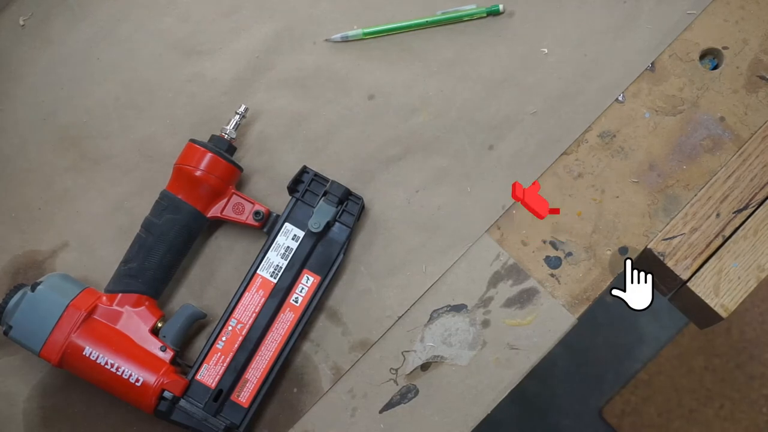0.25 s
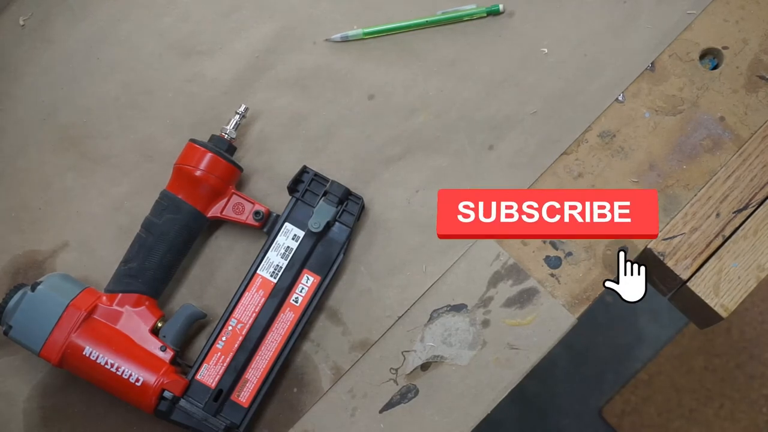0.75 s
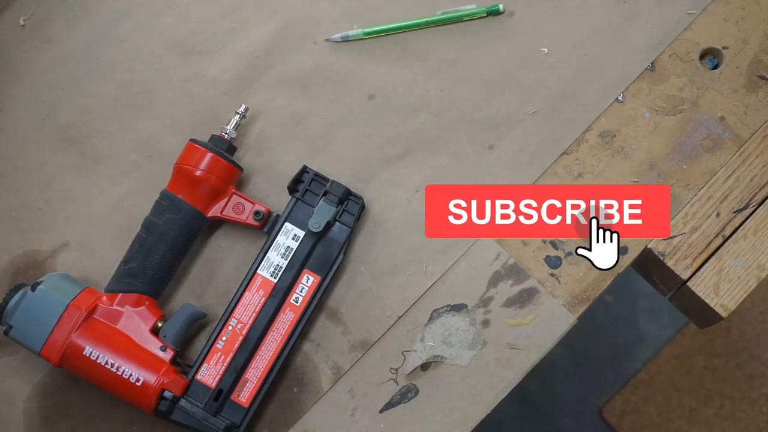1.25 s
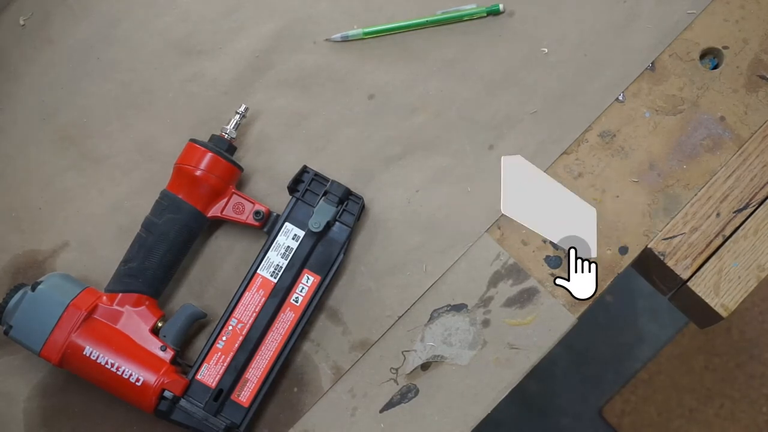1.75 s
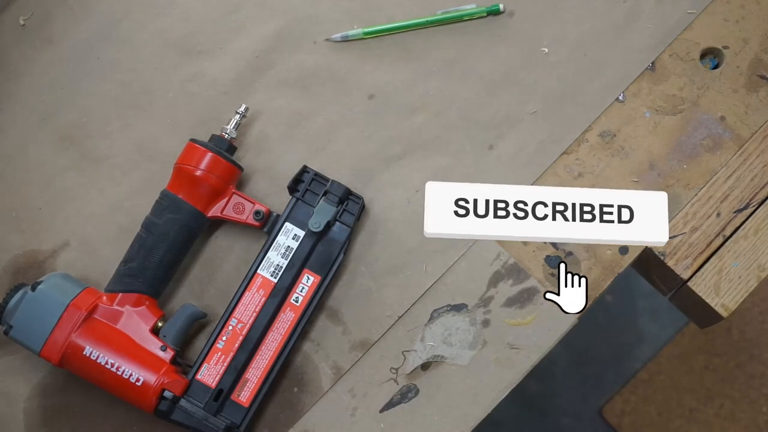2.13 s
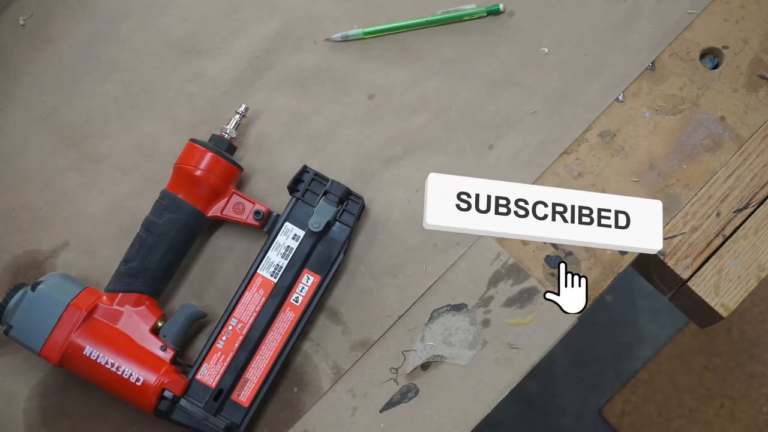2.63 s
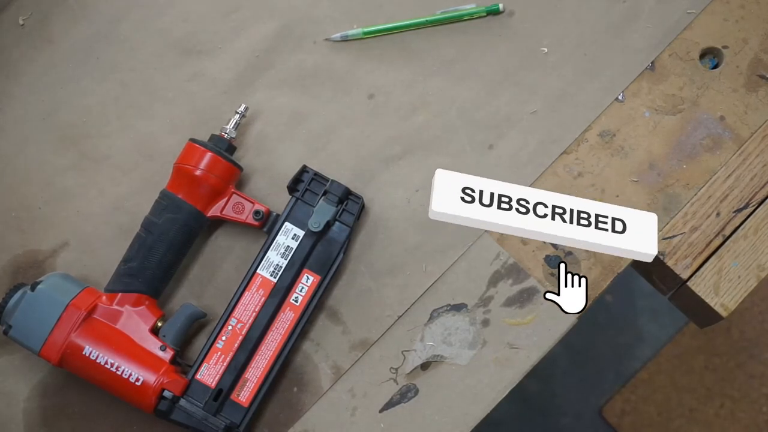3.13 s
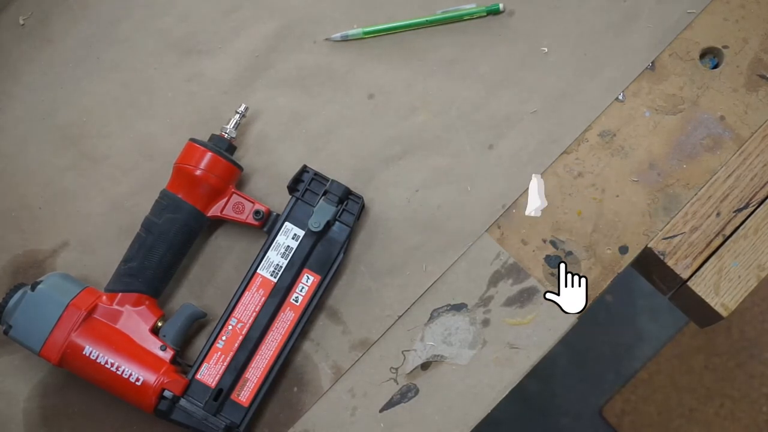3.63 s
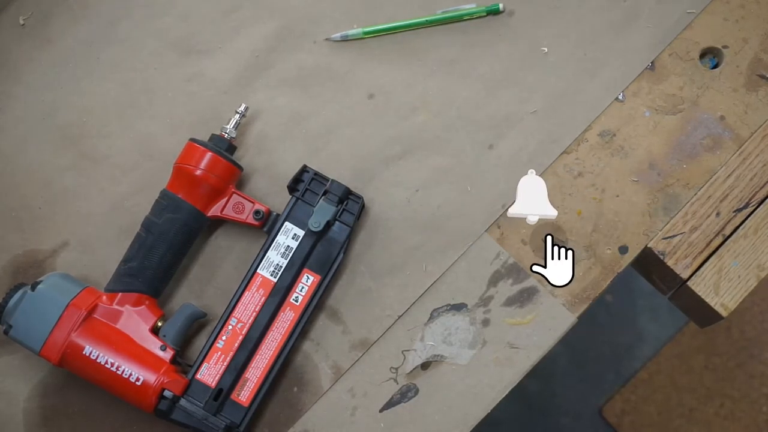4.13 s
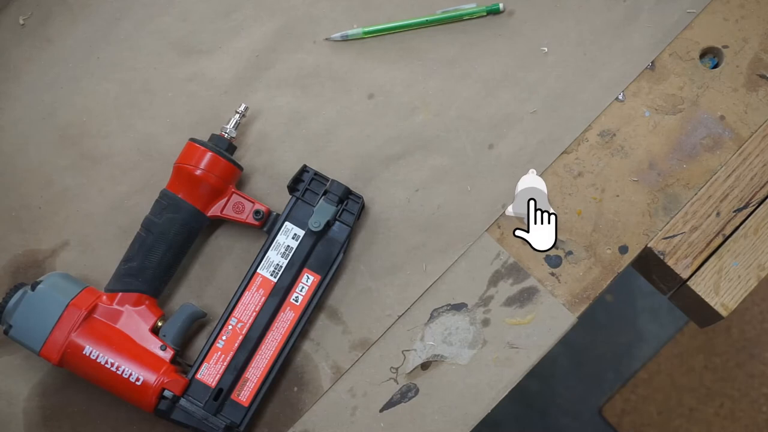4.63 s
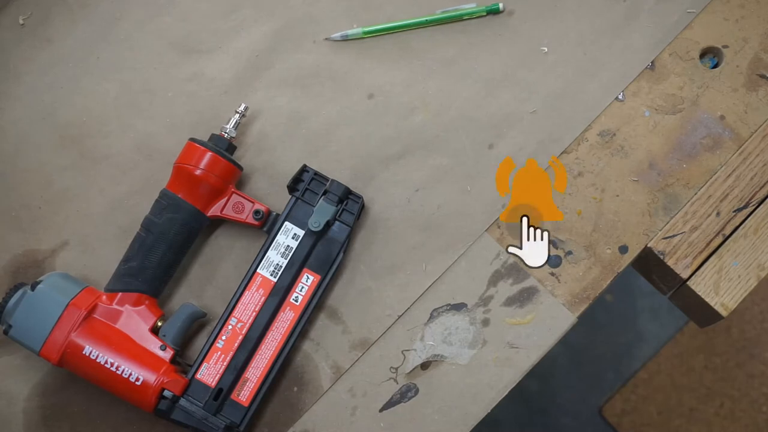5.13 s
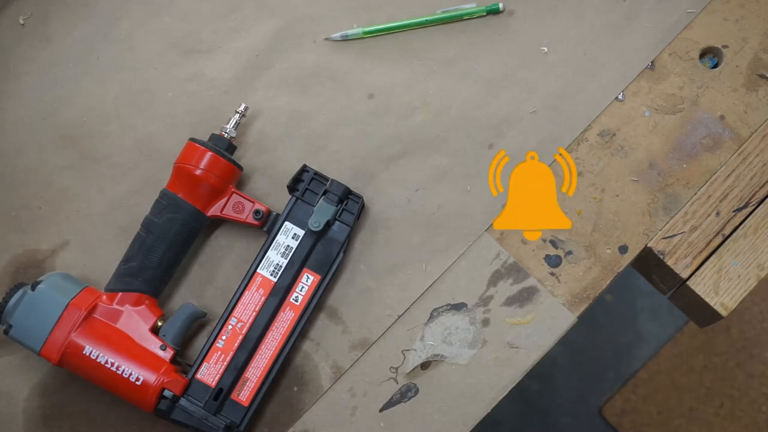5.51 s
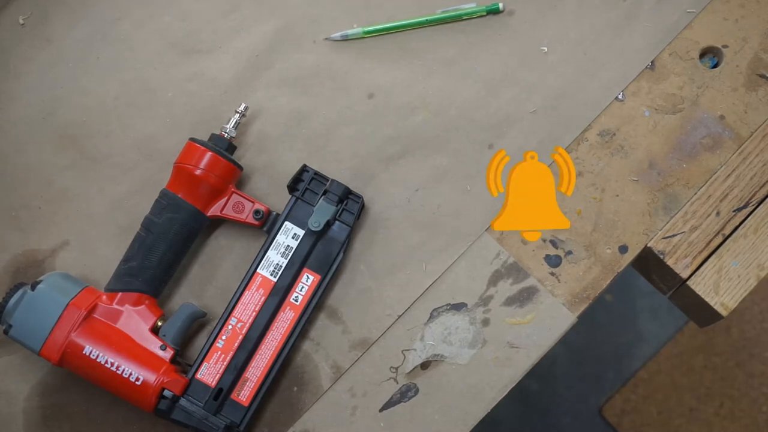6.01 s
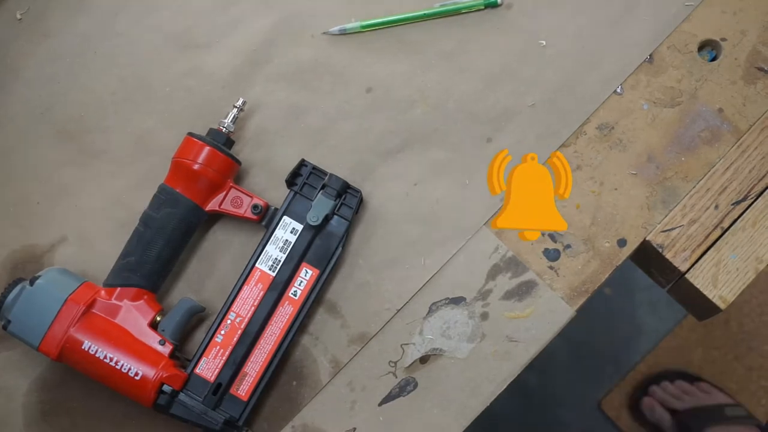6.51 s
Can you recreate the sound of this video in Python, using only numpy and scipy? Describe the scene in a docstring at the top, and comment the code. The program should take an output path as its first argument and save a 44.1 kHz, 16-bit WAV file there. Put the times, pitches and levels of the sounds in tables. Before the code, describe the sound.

Close in a small workshop, a miter saw already turning climbs to a loud, rough high whine with rushing fan noise. It cuts a board, its pitch sagging and the blade singing shrilly, then recovers. The brake pulls the whine swiftly down, the head knocks and bounces on its stop, light metal rattles and rings faintly, and after near-quiet wood scrapes over a humming bench.

```python
"""A miter saw in a workshop: shaft-locked tones and coloured noise rise as the motor, already turning, speeds up.
The blade goes through a board, its metal plate singing as narrow bands of noise; then the brake winds it down.
The head knocks against its stop and bounces, in bursts of fading noise; light metal rattles as fading tones.
The blade rings faintly in the same way, and wood is dragged over a humming bench: scraping noise and one low tone.
"""
import sys
import numpy as np
from scipy import signal
from scipy.fft import rfft, irfft
from scipy.io import wavfile
from scipy.ndimage import uniform_filter1d

SR = 44100
rng = np.random.default_rng(int(sys.argv[2]) if len(sys.argv) > 2 else 0)


def master(y):
    """Save y as 16-bit WAV."""
    cut = np.clip(np.atleast_2d(y).T, -1, 1)
    pcm = np.round(cut * 32767)  # scale
    wavfile.write(sys.argv[1], SR, pcm.astype(np.int16))


N = 297887
T = np.arange(N) / SR  # time in s
HZ = np.maximum(np.arange(N // 2 + 1) * SR / N, 1)  # frequency of each spectrum bin

# stages of the cut: full speed, teeth touch, deep in the board, through, head raised
UP_S, TOUCH_S, DEEP_S, THROUGH_S, RAISED_S = 1, 1.95, 2.87, 3.88, 4.066
BRAKE_S, OFF_S, STOP_S = 4.36, 4.38, 5.39  # brake sets in, noise levels start to sink, head reaches the stop
LEAN_DB = 2  # basic lean to the left, shared out over frequency in ports()

# speed of the shaft, running up, sagging under the cut and recovering: (time_s, turns_hz)
SHAFT_SPEED = [(0, 253), (.05, 263), (.2, 284), (.35, 299.5), (.5, 311), (.8, 326), (1.1, 335), (1.4, 342),
               (1.7, 347), (2, 350.3), (2.4, 352.6), (2.75, 349.8), (3.05, 344), (3.6, 330.8), (3.8, 329.3),
               (3.95, 331), (4.1, 337), (4.36, 341.5)]
# colour of the low rumble, shared by floor and dragged wood: (pitch_hz, relative level_db per Hz)
RUMBLE_COLOUR = [(20, -29), (35, -27), (48, -11), (57, 8.5), (68, 3), (95, -1), (125, 1.5), (160, -18.5),
                 (260, -25)]


def undb(db):
    """Gain of a level in dB."""
    return 10 ** (np.asarray(db) / 20)


def gate(start, end, fade):
    """Fully open from start to end, fading outside."""
    return np.clip(np.minimum(T - start, end - T) / fade + 1, 0, 1)


def curves(table, fade=.004):
    """Columns of a table over time, and a gate that is open over its span."""
    s, *columns = np.transpose(table)
    return [np.interp(T, s, column) for column in columns], gate(s[0], s[-1], fade)


def stage(start, full, cut, raised, fall_per_s):
    """A value that follows the stages of the cut and sinks steadily after switch-off."""
    times = [0, UP_S, TOUCH_S, DEEP_S, THROUGH_S, RAISED_S]
    held = np.interp(T, times, [start, full, full, cut, cut, raised])
    return held - fall_per_s * np.maximum(T - OFF_S, 0)


def colour(points):
    """Gain per frequency of (Hz, dB) points, almost silent outside them."""
    hz, db = np.transpose(points)
    return undb(np.interp(np.log(HZ), np.log(hz), db, -120, -120))


def peaks(modes, at_hz=HZ):
    """Gain per frequency of (Hz, width Hz, dB) resonances."""
    power = sum(undb(db) ** 2 / (1 + (2 * (at_hz - hz) / width) ** 2) for hz, width, db in modes)
    return np.sqrt(power)


def steep_peaks(modes):
    """Resonances applied twice: peaks get narrower and their dB differences double."""
    return peaks(modes) ** 2


def ports(first, second):
    """Two spectra to left and right: alike in the bass, mostly less so higher up; the left is louder and earlier."""
    # likeness of the two sides: (pitch_hz, likeness 0-1)
    wide = [(60, 1), (250, 1), (500, 0.94), (1000, 0.71), (2000, 0.63), (4000, 0.25), (8000, 0.07),
            (12000, 0.4)]
    # how much of the left lean each pitch gets: (pitch_hz, share)
    lean_shares = [(100, 0.11), (300, 0.38), (700, 0.64), (2000, 1.5), (8000, 1.26), (13000, 0.58)]
    like, lean = (np.interp(np.log(HZ), np.log(hz), value) for hz, value in map(np.transpose, (wide, lean_shares)))
    like = np.clip(like, 0, 1)
    lag_s = 2e-5  # delay of the part that both sides share
    right = like * first * np.exp(-2j * np.pi * HZ * lag_s) + np.sqrt(1 - like ** 2) * second
    side_gain = undb(LEAN_DB * lean / 2)
    return irfft(np.array([first * side_gain, right / side_gain]), N)


def noise(gain):
    """Coloured noise on both sides; the average of the two has rms 1."""
    real, imag = rng.standard_normal((2, 2, len(HZ)))
    both = ports(*((real + 1j * imag) * gain))
    return both / np.std(both.mean(0))


def walk(rate):
    """Slow random wandering: levels held for 1 / rate s and smoothed twice; spread near 1."""
    k = int(SR / rate)
    steps = np.repeat(rng.standard_normal(N // k + 1), k)
    return 1.3 * uniform_filter1d(uniform_filter1d(steps, k), k)[:N]


def tone(hz, db, waver_db, smear_hz):
    """A tone of about the given rms level whose size and pitch tremble."""
    size = np.sqrt(2) * undb(db + waver_db * walk(30))
    return size * np.sin(2 * np.pi * np.cumsum(hz + smear_hz * walk(60)) / SR)


def lifted(hz, db, waver_db, smear_hz):
    """A tone that swells where it meets a resonance of the saw's body."""
    # resonances added to the plain tone: (pitch_hz, width_hz, level_db)
    body_modes = [(270, 14, 8), (304, 16, 7), (351, 10, 7), (575, 50, 11), (1490, 130, 9), (1750, 120, 6),
                  (2320, 140, 10), (2880, 150, 8), (4720, 300, 10), (6674, 60, 1), (9500, 500, 12)]
    return np.hypot(1, peaks(body_modes, hz)) * tone(hz, db, waver_db, smear_hz)


def rippled(x):
    """Noise with a fine random ripple over frequency: two random sets of peaks and dips take turns."""
    spacing_hz, depth_db, turns_rate = 55, 3.6, 2.5  # the last is random steps per s
    k = int(spacing_hz / HZ[1])
    steps = np.repeat(rng.standard_normal((2, len(HZ) // k + 1)), k, axis=1)
    bumps = uniform_filter1d(steps, k)[:, :len(HZ)]
    gains = undb(depth_db * bumps / np.std(bumps))
    first, second = (irfft(rfft(x) * g / np.sqrt(np.mean(g ** 2)), N) for g in gains)
    share = .5 + .5 * np.tanh(2 * walk(turns_rate))
    return share * first + (1 - share) * second


def shop(x, wet_db):
    """Direct sound plus the room's reverberation: a noise tail whose treble dies first."""
    t60_s, treble_t60_s = .45, .3  # time to fade by 60 dB
    tail = rng.standard_normal((2, N))
    low = signal.sosfilt(signal.butter(1, 4000, fs=SR, output="sos"), tail)
    tail = low * undb(-60 * T / t60_s) + (tail - low) * undb(-60 * T / treble_t60_s)
    echoes = rfft(tail) / np.sqrt(np.sum(tail[0] ** 2))
    return ports(*(rfft(x) * (1 + undb(wet_db) * echoes)))


def background():
    """Low rumble through the floor, sinking during the cut and returning, and still air, as coloured noise."""
    # (time_s, level_db)
    rumbling = [(0.0, -66), (0.63, -67.5), (1.17, -78), (2.03, -71), (2.84, -83.5), (3.4, -81.5),
                (4.62, -67), (5.5, -74), (6.45, -74.5)]
    # colour of the still air: (pitch_hz, relative level_db per Hz)
    air_colour = [(88, -32.5), (150, -5.5), (833, -13), (1460, -24.5), (1980, -8), (2230, -20.5),
                  (10000, -28.5), (15000, -34)]
    rumble = noise(colour(RUMBLE_COLOUR)) * undb(curves(rumbling)[0][0])
    return rumble + noise(colour(air_colour)) * undb(-76)


def drag():
    """Wood scrapes over the bench and sets its panel humming and the floor rumbling."""
    # levels over time: (time_s, scrape_db, bright_grit_db, bench_hum_db, rumble_db)
    levels = [(6.47, -84, -80, -88, -79), (6.483, -50, -62, -52, -49), (6.52, -49, -60, -52, -48),
              (6.555, -47.5, -60, -66, -52), (6.58, -48, -58, -55, -48), (6.6, -47.5, -59, -42.5, -52),
              (6.66, -45, -57, -38.5, -48), (6.7, -46, -55, -39, -56), (6.755, -46, -50, -35, -59)]
    # colours of scrape and grit: (pitch_hz, relative level_db per Hz)
    scrape_colour = [(71, -44), (120, -14), (316, -12), (377, -10), (480, -17.5), (942, -23), (1050, -18),
                     (3000, -37), (3900, -67), (6600, -120)]
    grit_colour = [(1060, -20), (1800, -4), (2200, -5), (2900, -8.5), (5590, -13), (12700, -14),
                   (16000, -18)]
    # resonances added to the plain scrape: (pitch_hz, width_hz, level_db)
    scrape_modes = [(690, 120, 5), (1060, 110, 2), (1380, 150, 3), (1600, 150, 2)]
    (scrape_db, grit_db, hum_db, rumble_db), on = curves(levels, 0.0027)
    bench_hz, bench_width_hz = 380, 13  # the width is before steep_peaks narrows it
    hum = .25 * noise(steep_peaks([(bench_hz, bench_width_hz, 0)])) + tone(bench_hz + 0 * T, 0, 1.5, 3.)
    scrape = noise(colour(scrape_colour) * (1 + peaks(scrape_modes))) * undb(scrape_db + 1.1 * walk(40))
    rumble = noise(colour(RUMBLE_COLOUR)) * undb(rumble_db)
    grit = noise(colour(grit_colour)) * undb(grit_db + 0.98 * walk(50))
    return on * (scrape + rumble + grit + hum * undb(hum_db))


def ring(s, db, modes, attack_s):
    """Free decay of struck metal: each mode is a sine that fades at its own pace."""
    t = np.maximum(T - s, 0)
    fading = sum(undb(g - 60 * t / t60) * np.sin(2 * np.pi * hz * t) for hz, g, t60 in modes)
    return undb(db) * np.minimum(t / attack_s, 1) * fading


def metal():
    """A light metal rattle of four tings, then the blade ringing freely."""
    # (start_s, level_db)
    tings = [(6.066, -63), (6.088, -67), (6.11, -67), (6.14, -74)]
    # modes of rattle and blade: (pitch_hz, relative level_db, t60_s, the time to fade by 60 dB)
    rattle_modes = [(1250, -3, 0.37), (2090, 5, 0.23), (2176, -5, 0.35), (2580, -10, .3), (3240, -5, .3),
                    (3280, -7, 0.28), (3870, -10, .4), (4360, -12, .25)]
    blade_modes = [(834, -10, .6), (1798, -10, .4), (1927, 0, 3), (2050, -2, 1.1), (2805, -11, 2),
                   (3332, -17, 3), (3881, -9, .5), (4102, -12, .5)]
    rattle = sum(ring(s, db, rattle_modes, .003) for s, db in tings)
    return rattle + ring(6.16, -71.5, blade_modes, .05)


def knocks():
    """Head against stop: a sharp crack, then clatter of wood and metal that fades faster in the treble."""
    # (start_s, crack_db, clatter_db, wood_share_db, treble_share_db, t60_s of the clatter below its treble)
    hits = [(5.403, -38, -37, -21, 3, 0.59), (5.489, -68, -60, 16, -10, 0.14),
            (5.5185, -31, -46, 7.5, 6, 0.45), (5.64, -53, -50, -3, 5.5, 0.43),
            (5.84, -65, -69, -1, -5.5, 0.89), (6.064, -70, -61.5, -22, -20, 0.34),
            (6.109, -64, -70.5, -21, 3, 0.38)]
    # metal of the stop, added to the plain noise: (pitch_hz, width_hz, level_db)
    stop_modes = [(1820, 1100, 4.5), (3760, 330, 0), (4730, 300, 0)]
    # wood under the stop, before steep_peaks: (pitch_hz, width_hz, level_db)
    board_modes = [(193, 31, -4.5), (244, 19, -3), (370, 78, -4), (484, 97, -2), (729, 180, -2),
                   (943, 180, -2), (1430, 250, -5.5)]
    body = 1.0 + peaks(stop_modes)
    low = noise(steep_peaks(board_modes))
    bands = [(2630, 6600, 0), (10600, 10800, 0)]
    mid, high = (noise(body * steep_peaks([band]) * HZ / (HZ + 900)) for band in bands)
    out = np.zeros((2, N))
    waver_db = 1.5 * walk(40)  # the low wooden noise wavers at random
    for s, crack_db, clatter_db, low_db, high_db, t60 in hits:
        t = np.maximum(T - s, 0)
        rise = np.minimum(t / .0007, 1)
        crack = undb(crack_db) * np.exp(-t / .002) * (.4 * mid + high)
        # the wooden body swells a little late
        wood = undb(low_db + waver_db - 60 * t / t60) * (1 - np.exp(-t / 0.023)) * low
        # the far walls answer for longer
        echo = undb(-20.0 - 60 * t / 1.0) * (mid + low)
        clatter = wood + echo + undb(-60 * t / t60) * mid + undb(high_db - 85 * t / t60) * high
        out += rise * (crack + undb(clatter_db) * clatter)
    pan_db = 1 - LEAN_DB  # trims the left lean that noise() already has
    return out * undb(np.array([[1], [-1]]) * pan_db / 2)


def singing():
    """Modes of blade and guard that sing for a while: steady, slightly rough tones that swell in and die out."""
    # (start_s, end_s, pitch_hz, level_db before the mix)
    modes = [(0, .13, 2310, -48), (0, .9, 1410, -57), (.36, .5, 2340, -51), (.4, .95, 3370, -50),
             (.95, 1.3, 3420, -50), (1.3, 1.5, 3540, -52), (1.7, 1.9, 4130, -48), (1.7, 1.85, 4460, -50),
             (2.25, 2.6, 3770, -50), (2.5, 2.85, 3850, -50), (2.9, 3.3, 3690, -53), (3.3, 4.36, 3572, -51),
             (3.95, 4.36, 2705, -53), (4.0, 4.4, 3845, -53), (4.5, 4.82, 4610, -56),
             (4.52, 4.62, 9550, -60), (4.7, 4.85, 9350, -65), (4.4, 4.55, 10200, -60),
             (5.78, 5.95, 2760, -78), (5.85, 5.97, 3900, -84)]
    fade_s = .08
    return sum(gate(start, end, fade_s) * tone(hz + 0 * T, db, 2., 13.) for start, end, hz, db in modes)


def braking():
    """The brake's hum and whines, whose pitch falls away exponentially."""
    # (multiple of the whine's pitch, level_db before the mix, fall in dB per s)
    brake_whines = [(1, -47, 20), (2, -51.5, 14), (3.25, -53, 28), (5.25, -62, 35), (6.5, -64, 20)]
    since = np.maximum(T - BRAKE_S, 0)
    on = gate(BRAKE_S, STOP_S, 0.022)
    whine_hz, crawl_hz, whine_fall_s = 2620, 130, .46  # start, the crawl it nears, time constant
    hz = crawl_hz + (whine_hz - crawl_hz) * np.exp(-since / whine_fall_s)
    whine = 0
    for k, db, fall_db in brake_whines:
        # each whine is two rough strands, a little apart
        for apart in (.98, 1.015):
            whine = whine + lifted(k * hz * apart, db - fall_db * since - 3, 3.5, 40. * k)
    hum_hz, hum_fall_s, hum_fade_s = 327, .68, 0.19
    hum = np.exp(-(since / hum_fade_s) ** 2) * tone(hum_hz * np.exp(-since / hum_fall_s), -50.5, 2.6, 5.7)
    return on * hum, on * whine


def whines():
    """Tones locked to the shaft (unbalance hum, blade teeth, gear mesh, fan blades), then those of the brake."""
    # levels before the mix: (start_db, full_speed_db, in_board_db, head_raised_db, fall in dB per s)
    hum_stages = (-54.5, -58, -61.5, -52, 0)
    tooth_stages = (-70, -61, -69, -71, 0)
    gear_stages = (-48, -62, -65, -61, 0)
    whistle_stages = (-62, -59, -58, -59, 0)
    fan_stages = (-51, -50.5, -54, -49, 0)
    # overtones: (multiple of the tooth tone or of the shaft, level_db relative to the fan whine)
    tooth_overtones = [(6, -16), (7, -12), (10, -12)]
    shaft_overtones = [(2, -17), (2.54, -16), (4, -14), (14, -10), (28, -15), (38, -6), (42, -9)]
    tooth_turns, fan_blades, gear_turns, whistle_turns = 25 / 6, 19, 7.67, 10.67  # cycles per shaft turn
    (shaft,), on = curves(SHAFT_SPEED, 0.03)
    fan_db = stage(*fan_stages)
    whine = lifted(tooth_turns * shaft, stage(*tooth_stages), 2.5, 7.)
    whine += lifted(fan_blades * shaft, fan_db, 2.5, 8.)
    whine += lifted(gear_turns * shaft, stage(*gear_stages), 3., 12.)
    whine += tone(whistle_turns * shaft, stage(*whistle_stages), 4., 14.)
    whine += sum(tone(k * tooth_turns * shaft, fan_db + db, 4., 10.) for k, db in tooth_overtones)
    whine += sum(tone(k * shaft, fan_db + db, 4., 7.) for k, db in shaft_overtones)
    hum = lifted(shaft, stage(*hum_stages), 1.5, 2.)
    brake_hum, brake_whine = braking()
    return on * hum + brake_hum, on * whine + brake_whine


def housing_noise(shared_db):
    """Turbulence in the housing: noise coloured by its resonances."""
    # (pitch_hz, relative level_db per Hz)
    housing_colour = [(110, -57), (180, -23), (331, -1), (384, -5), (860, -0.5), (1230, -2.5), (1410, -1.5),
                      (1520, -0.5), (2050, -3.5), (3500, -4.5), (4550, -43), (7700, -120)]
    # resonances added to the plain noise: (pitch_hz, width_hz, level_db)
    housing_modes = [(557, 7.6, 0), (695, 21, -35.5), (1410, 83, -16.5), (2382, 160, 3)]
    # (start_db, full_speed_db, in_board_db, head_raised_db, fall in dB per s)
    stages = (-40.5, -40.5, -45, -41.5, 14)
    level_db = stage(*stages) + shared_db + 0.73 * walk(21.95)
    return noise(colour(housing_colour) * (1 + peaks(housing_modes))) * undb(level_db)


def fan_rush(shared_db):
    """The fan's rush: noise tied to the shaft's angle, so its pitch follows the speed."""
    # rush at 350 turns a second, before steep_peaks: (pitch_hz, width_hz, level_db)
    fan_modes = [(2680, 380, -1), (3600, 480, 0), (4230, 600, 1.5), (4950, 500, -3)]
    # (start_db, full_speed_db, in_board_db, head_raised_db, fall in dB per s)
    stages = (-40, -38, -43, -38.5, 14)
    angle = np.cumsum(curves(SHAFT_SPEED)[0][0] / 350)
    rush = np.array([np.interp(angle, np.arange(N), side) for side in noise(steep_peaks(fan_modes))])
    # the rush swells by 1 dB as the blade nears the board
    swell_db = 1 * np.exp(-((T - 1.84) / 0.38) ** 2)
    return rush * undb(stage(*stages) + swell_db + shared_db + .6 * walk(24.78))


def bright_hiss():
    """Bright hiss of blade and air, in a main and a top band that flicker together at random."""
    # colours of the two bands: (pitch_hz, relative level_db per Hz)
    hiss_colour = [(2820, -2), (4800, 0), (5820, -0.5), (6510, 0), (8240, -2.5), (10000, -7.5),
                   (13000, -39.5), (22000, -120)]
    top_colour = [(5590, -9.5), (9500, -2), (10900, 0.5), (14000, -2.5), (14900, -3), (16000, -13.5)]
    # (start_db, full_speed_db, in_board_db, head_raised_db, fall in dB per s)
    hiss_stages = (-37.5, -39.5, -39.5, -41, 18.5)
    top_stages = (-45, -42, -37.5, -42.5, 28.5)
    # depth of the flicker in dB before weighting, in the same stages
    flicker_stages = (.4, .5, .55, .37, .12)
    flicker_db = stage(*flicker_stages) * walk(29.91)
    hiss = noise(colour(hiss_colour)) * undb(stage(*hiss_stages) + 1.2 * flicker_db + .5 * walk(30))
    return hiss + noise(colour(top_colour)) * undb(stage(*top_stages) + flicker_db)


def plate_song():
    """The blade plate rubbed by wood: narrow noise bands that each come and go at random."""
    # (time_s, singing_db, level_db of the low plate mode that joins at the end of the cut)
    cut_levels = [(1.95, -66, -70), (2.15, -46, -62), (2.55, -42.5, -59), (3.5, -42, -57), (3.6, -42, -47),
                  (3.93, -43, -47), (4.02, -54, -56), (4.9, -66, -75)]
    # (pitch_hz, width_hz before steep_peaks, relative level_db)
    plate_modes = [(6080, 30, -5), (7290, 40, 0), (7519, 25, -1), (8970, 50, -2), (9330, 35, -4),
                   (9822, 40, -1), (10217, 25, 1), (10720, 45, -4), (11080, 30, 0), (11281, 25, 0),
                   (12170, 40, -6), (12600, 50, -3), (13520, 35, -3), (14350, 90, -4)]
    # the low mode: (pitch_hz, width_hz before steep_peaks, level_db)
    low_mode = (4452, 30, 0)
    (cut_db, late_db), cutting = curves(cut_levels)
    plate = sum(noise(steep_peaks([mode])) * undb(mode[2] + 2.8 * walk(9)) for mode in plate_modes)
    plate = undb(cut_db) * plate / np.sqrt(len(plate_modes))
    return cutting * (plate + undb(late_db) * noise(steep_peaks([low_mode])))


def guard_shudder():
    """Sheet metal of the guard shaken by the brake, with one low mode that lingers."""
    # (time_s, guard_db, lingering_mode_db)
    shudder_levels = [(4.4, -45, -77), (4.68, -48, -47), (5.0, -56, -54), (5.4, -78, -59), (5.7, -82, -63),
                      (5.86, -88, -61), (5.95, -95, -70), (6.1, -101, -76)]
    # guard and its lingering mode, before steep_peaks: (pitch_hz, width_hz, level_db)
    guard_modes = [(565, 70, -8), (2960, 450, -5), (4650, 400, -1), (6500, 2500, -14), (9500, 700, -6)]
    low_mode = (1485, 220, 0)
    (shudder_db, linger_db), shaking = curves(shudder_levels)
    guard = noise(steep_peaks(guard_modes)) * undb(shudder_db + 2.2 * walk(20))
    guard += noise(steep_peaks([low_mode])) * undb(linger_db + 1.2 * walk(15))
    return shaking * guard


def roar():
    """All the noise of the saw: housing, fan, bright hiss, singing plate and shaking guard."""
    # left minus right in dB, before trimming: (start, full speed, in the board, head raised, fall per s)
    pan_stages = (2.6, 3.1, 2.7, 2.6, .5)
    on = gate(0, STOP_S, 0.12)
    shared_db = .5 * walk(5.63)  # housing and fan waver together
    pan_db = stage(*pan_stages) - LEAN_DB  # trims the left lean that noise() already has
    pan = undb(np.array([pan_db, -pan_db]) / 2)
    airborne = on * rippled(fan_rush(shared_db) + bright_hiss()) + plate_song() + guard_shudder()
    return on * rippled(housing_noise(shared_db)) + pan * airborne


def scene():
    """Saw left of centre; the whines arrive partly off the walls, the hum with less reverberation."""
    hum, whine = whines()
    tones = shop(undb(-1.5) * hum, -6.) + shop(undb(-.8) * whine + singing(), -3.5)
    return roar() + tones + shop(metal(), -16.0) + knocks() + drag() + background()


def record(dry):
    """A steep low-pass filter cuts the top above 15.8 kHz."""
    return signal.sosfilt(signal.ellip(10, .2, 70, 15800, fs=SR, output="sos"), dry)


dry = scene()
out = record(dry)
master(out)
```